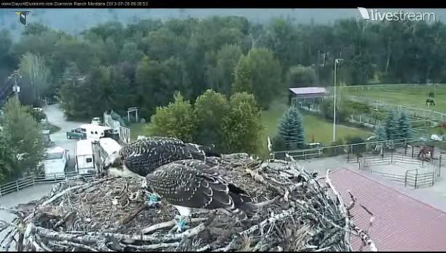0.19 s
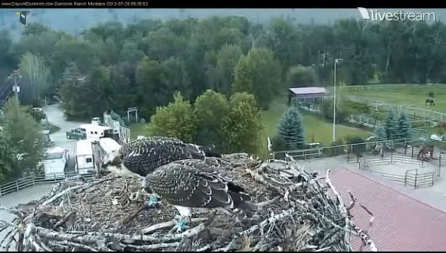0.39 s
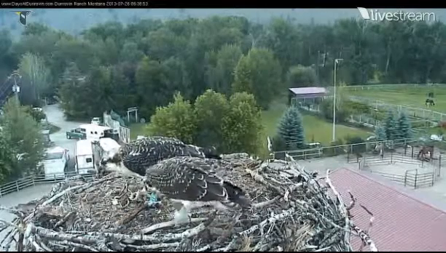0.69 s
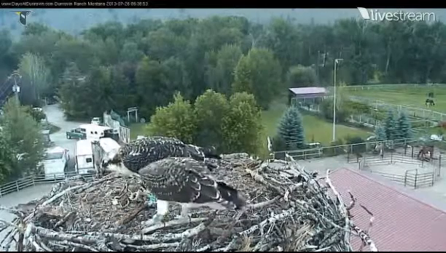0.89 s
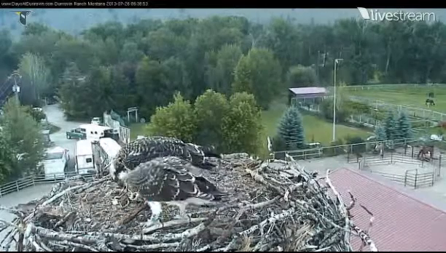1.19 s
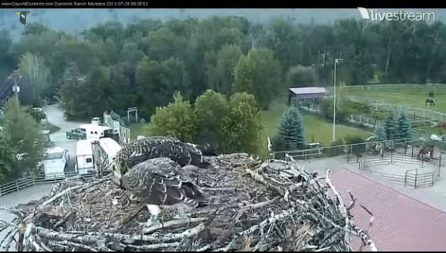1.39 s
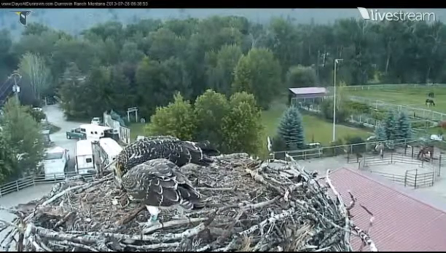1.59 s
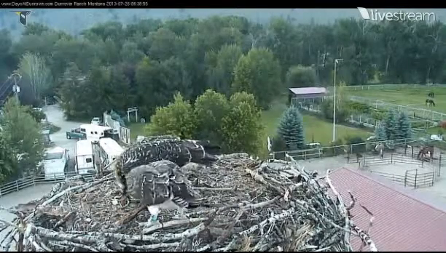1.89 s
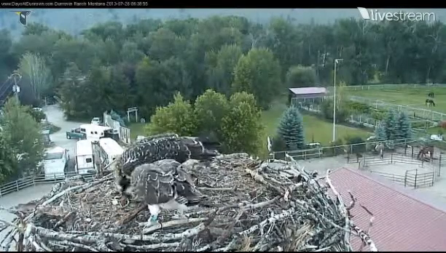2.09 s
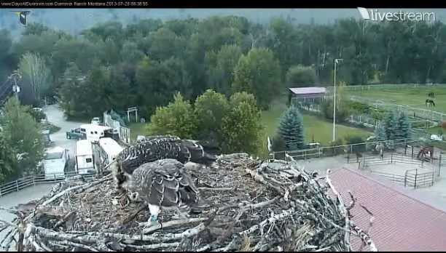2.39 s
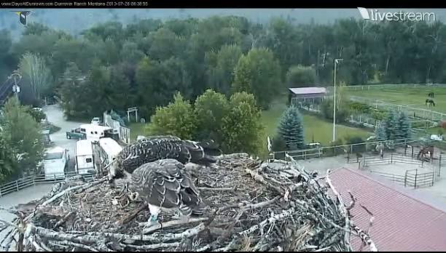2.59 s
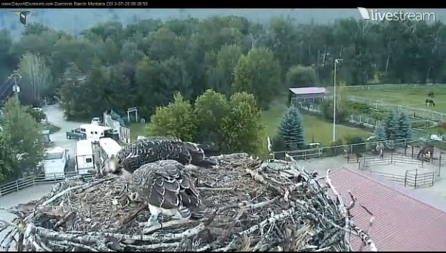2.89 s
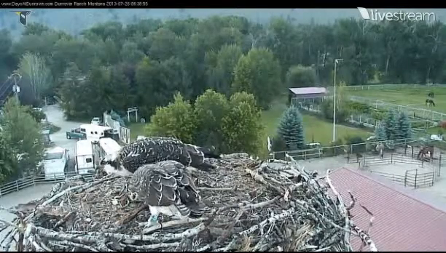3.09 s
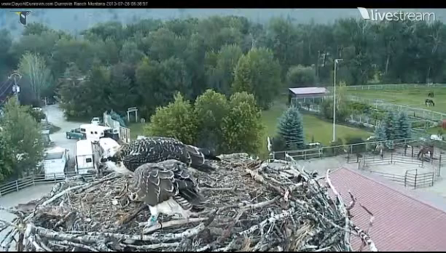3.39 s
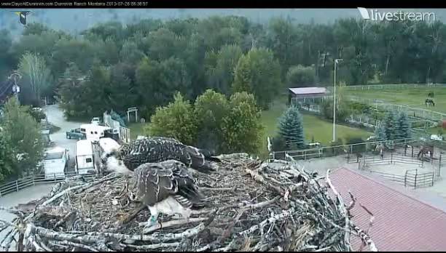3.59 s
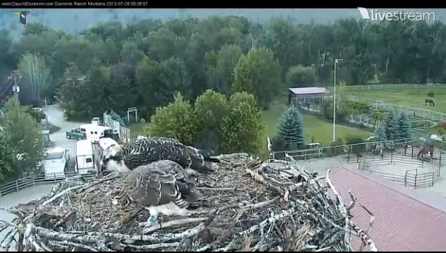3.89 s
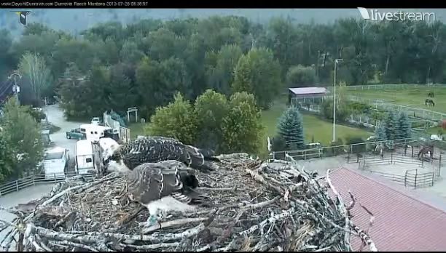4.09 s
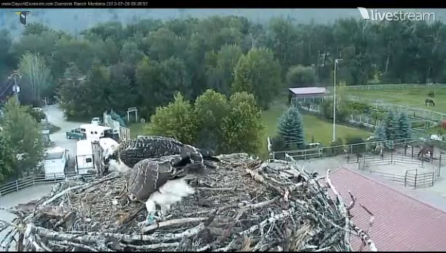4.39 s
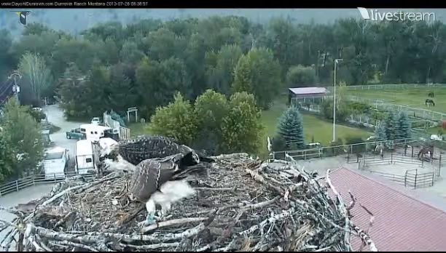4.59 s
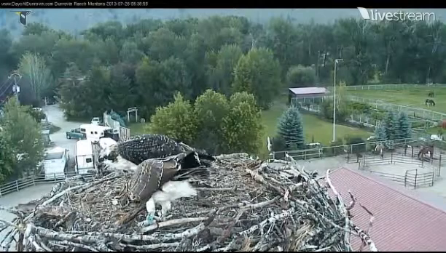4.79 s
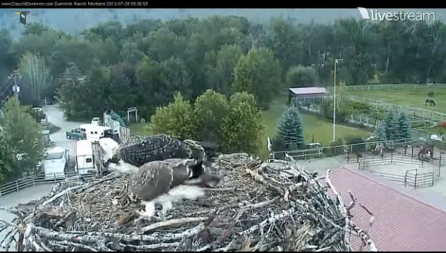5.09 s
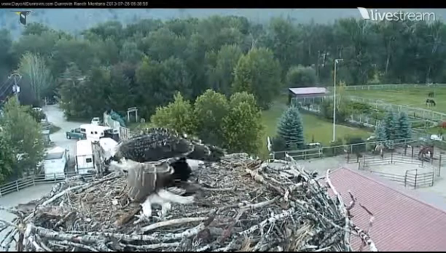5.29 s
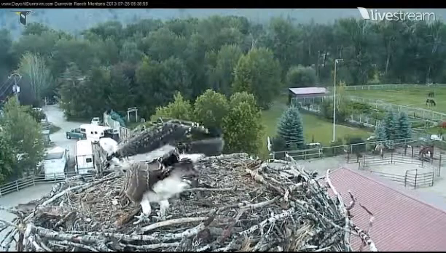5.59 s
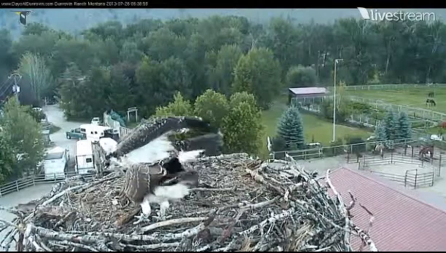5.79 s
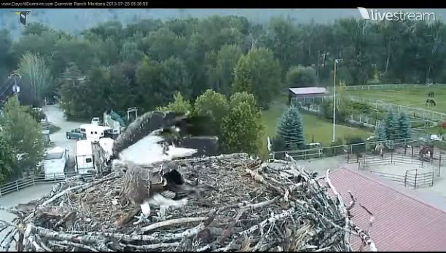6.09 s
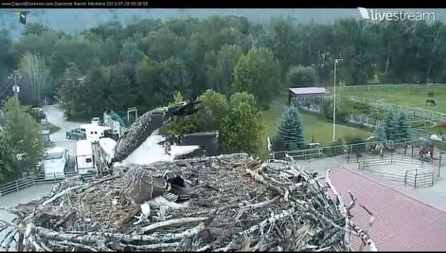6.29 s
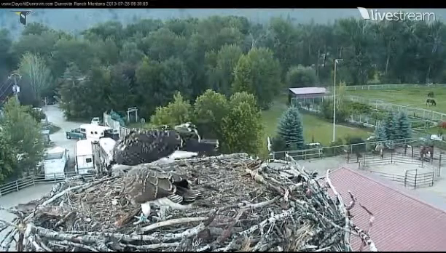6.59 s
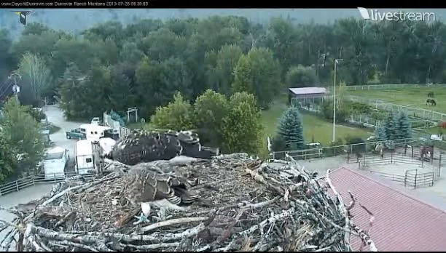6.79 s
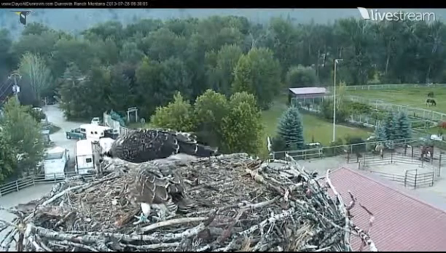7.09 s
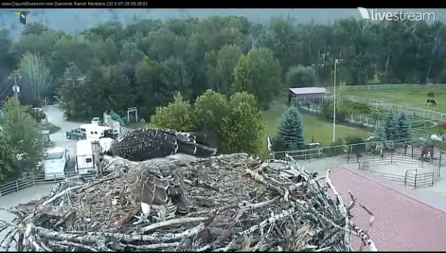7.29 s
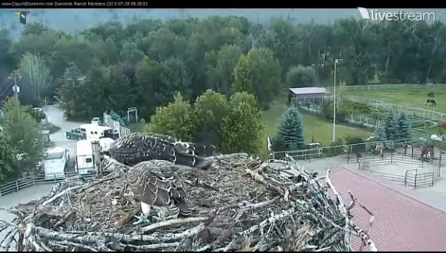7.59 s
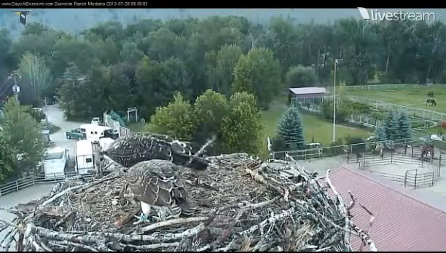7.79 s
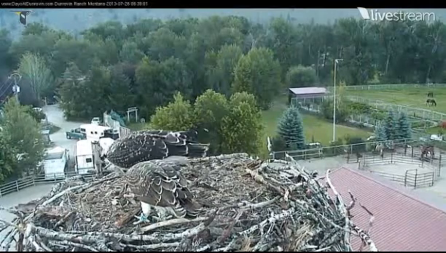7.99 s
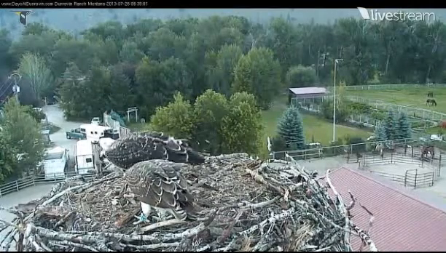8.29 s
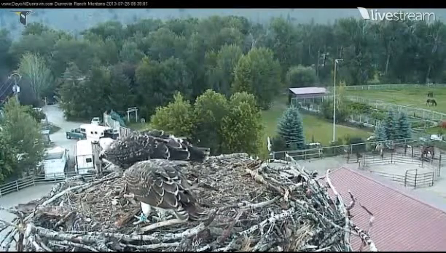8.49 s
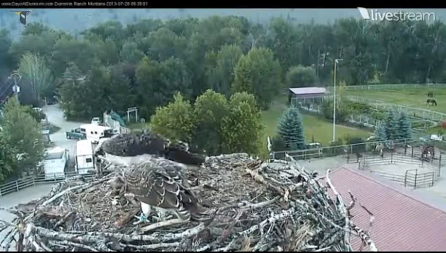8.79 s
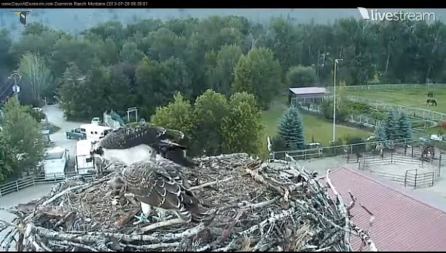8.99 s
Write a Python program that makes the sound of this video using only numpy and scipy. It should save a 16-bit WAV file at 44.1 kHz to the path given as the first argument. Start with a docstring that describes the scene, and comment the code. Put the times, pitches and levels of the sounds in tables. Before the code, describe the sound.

High, loud, slightly overloaded nestling whistles in runs, with chirping small birds, light stick rustles and a low, steady outdoor murmur.

```python
"""Two young birds of prey whistle in their nest by a pole-top microphone: one near-pure, one hoarse with rasp.
Small birds add gliding chirps, shaken burrs and two-voiced falling whistles; short noisy bursts rustle sticks.
Under them lie coloured-noise murmur, random sweeps of far birds, mains tones and a far drone that swells once.
The left channel carries the scene, and the loudest whistles overload it; weak bands drop out, more so near loud
sounds, and the sound steps slightly every 0.1 s. The right has faint idle noise."""
import sys
import numpy as np
from scipy import signal
from scipy.fft import rfft, irfft, next_fast_len
from scipy.io import wavfile
from scipy.ndimage import uniform_filter1d, minimum_filter1d, map_coordinates

SR = 44100
rng = np.random.default_rng(int(sys.argv[2]) if len(sys.argv) > 2 else 0)


def int16_out(signal):
    """Quantize to a 16-bit WAV file."""
    q = np.round(np.clip(np.atleast_2d(signal).T, -1, 1) * 32767)
    wavfile.write(sys.argv[1], SR, q.astype(np.int16))


def gain_from_db(level_db):
    """Convert decibel levels to linear amplitude factors (20 dB per decade)."""
    decades = np.asarray(level_db, float) / 20
    return 10 ** decades


N = 402633
T = np.arange(N) / SR
# Source levels below are at the microphone, ahead of the doubling gain of the left input.


def unit(x):
    """Scaled to rms 1."""
    return x / np.sqrt(np.mean(x ** 2) + 1e-20)


def wobble(rate):
    """A smooth random curve, rate knots a second."""
    return map_coordinates(rng.standard_normal(int(N * rate / SR) + 4), [T * rate])


def filtered(x, response):
    """x times a response of frequency."""
    m = next_fast_len(N + 8192)
    return irfft(rfft(x, m) * response(np.fft.rfftfreq(m, 1 / SR)), m)[..., :N]


def noise(spectrum, patchy_db):
    """Coloured noise of rms 1 whose gain varies in random patches of time and frequency."""
    z = signal.stft(rng.standard_normal(N), nperseg=512)[2]
    field = uniform_filter1d(rng.standard_normal(z.shape), size=4, axis=0)
    field = uniform_filter1d(field, size=6, axis=1)
    patchy = signal.istft(z * gain_from_db(patchy_db * unit(field)), nperseg=512)[1][:N]
    f, db = np.transpose(spectrum)

    def colour(hz):
        return gain_from_db(np.interp(np.log(hz + 1), np.log(f + 1), db, left=-120, right=-120))

    return unit(filtered(patchy, colour))


def voice(notes, jitter_hz, bend_hz=0, size=220):
    """Phase of the syrinx and one gain curve per dB column; silent between notes."""
    s, hz, *dbs = np.vstack(notes).T
    sounding = sum((T >= note[0][0]) & (T < note[-1][0]) for note in notes) > 0
    gate = uniform_filter1d(sounding * 1., size=200)
    pitch = uniform_filter1d(np.interp(T, s, hz), size=size) + bend_hz  # muscles round a glide's corners
    phase = 2 * np.pi * np.cumsum(pitch + jitter_hz * wobble(150)) / SR
    return [phase] + [np.sqrt(2) * gate * gain_from_db(np.interp(T, s, db)) for db in dbs]


def echoes(x, t60):
    """Scattered answer of roofs and trees: a noise tail that falls 60 dB in t60 seconds."""
    tail = rng.standard_normal(SR // 2) * gain_from_db(-60 * T[:SR // 2] / t60)
    return signal.fftconvolve(x, tail / np.linalg.norm(tail))[:N]


# Colour of the valley's murmur: (f/Hz, relative level/dB)
MURMUR_SPECTRUM = [(12, -51.5), (25, -30.5), (59, -21), (85, -8), (110, -6), (150, -12.5), (260, -8),
                   (400, -11.5), (917, -7.5), (1720, -15.5), (3000, -17.5), (4200, -27.5), (5100, -34),
                   (6000, -72)]


def valley_murmur():
    """Traffic and leaves blend into coloured noise whose level drifts slightly."""
    level_db = -36.5 + 0.2 * wobble(3.3) + 0.33 * wobble(6)
    return gain_from_db(level_db) * noise(MURMUR_SPECTRUM, patchy_db=1.5)


def twitter(count):
    """Many far small birds: quick, burry random sweeps that come and go."""
    pitch = [3500 + 450 * wobble(40) for _ in range(count)]  # Hz
    size = [gain_from_db(6 * wobble(30)) * (.5 + wobble(300)) for _ in range(count)]
    sweeps = [a * np.sin(2 * np.pi * np.cumsum(hz) / SR) for a, hz in zip(size, pitch)]
    return unit(sum(sweeps))


# Colour of the noise in the far chorus: (f/Hz, relative level/dB)
CHORUS_SPECTRUM = [(2200, -35.5), (2900, -8.5), (3500, 2), (4100, -13.5), (4800, -11.5)]
# Level of the far chorus, and at 3.85 s of rasping noise from the hoarse nestling:
# (t/s, level/dB ahead of flutter and mixing)
CHORUS_AND_RASP_LEVEL = [(0, -34), (.15, -28.5), (.38, -34.5), (.5, -42), (.7, -40), (1.05, -58.5),
                         (1.6, -34.5), (1.85, -63), (2.3, -33.5), (2.9, -62), (3.23, -34.5), (3.55, -60.5),
                         (3.85, -22), (4.1, -45), (4.4, -44.5), (4.85, -49), (5.05, -38), (5.45, -46.5),
                         (5.75, -52), (5.97, -45.5), (6.35, -69), (6.95, -53), (7.24, -30.5), (7.5, -54),
                         (7.83, -40), (8.05, -68), (8.32, -36.5), (8.7, -70), (9.13, -41.5)]


def distant_chorus():
    """Far birds blur into sweeps, echoes and coloured noise; near 3.85 s it is the hoarse nestling's rasp."""
    birds = twitter(count=4)
    blur = 0.75 * birds + .65 * echoes(birds, t60=0.043) + 0.68 * noise(CHORUS_SPECTRUM, patchy_db=5.5)
    return gain_from_db(np.interp(T, *np.transpose(CHORUS_AND_RASP_LEVEL)) + 4.0 * wobble(10)) * blur


# Mains harmonics: (f/Hz, rms level/dB ahead of wavering)
HUM_LINES = [(119.9, -47), (239.8, -49.5), (359.7, -57.5)]


def mains_hum():
    """Steady-pitched sines whose levels waver."""
    return sum(np.sqrt(2) * gain_from_db(db + 1.2 * wobble(6.2)) * np.sin(2 * np.pi * hz * T)
               for hz, db in HUM_LINES)


def chirp(start, length, first_hz, turn_hz, last_hz, db):
    """Corners (t/s, f/Hz, level/dB) of a chirp: hold, glide to the turn, glide to the end."""
    hold, turn, edge = 0.43, .63, .15  # shares of the length
    share = np.array([0, edge, hold, turn, 1 - edge, 1])
    hz = np.interp(share, [hold, turn, 1], [first_hz, turn_hz, last_hz])
    fade_db = np.array([-7, 0, 0, 0, 0, -7])
    thin_db = -5.5 * np.maximum(hz - 3800, 0) / 1000  # high notes are weaker, per kHz
    return np.transpose([start + length * share, hz, db + fade_db + thin_db])


# Chirps of small birds: (start t/s, length t/s, first f/Hz, turn f/Hz, last f/Hz,
# level/dB ahead of fades and the thinning of high notes)
CHIRPS_OF_BIRDS = [(-.045, .089, 3290, 3950, 2459, -14), (0.183, .05, 3300, 3540, 3124, -23),
                   (0.244, .065, 2171, 3179, 1966, -21), (.97, .055, 3260, 3340, 4390, -45.5),
                   (1.015, .045, 4550, 4900, 4046, -40), (1.945, .055, 3440, 4770, 3580, -40),
                   (2.115, 0.087, 4200, 3950, 3890, -53), (2.197, 0.044, 3150, 4800, 3506, -19),
                   (2.243, .098, 3322, 3880, 2545, -13.5), (2.362, .06, 3516, 3650, 2550, -30),
                   (2.414, .045, 3570, 3500, 2480, -33.5), (2.538, .06, 3750, 4600, 3204, -40),
                   (5.831, .065, 3274, 4694, 3696, -41), (6.378, 0.078, 3550, 3300, 2404, -45.5),
                   (6.459, .06, 3500, 4900, 3745, -39.5), (6.565, 0.051, 3340, 4260, 3890, -44.5),
                   (7.027, 0.065, 3370, 4900, 3512, -23), (7.085, .082, 3313, 3738, 2540, -12),
                   (7.8, 0.053, 3480, 3900, 4050, -41.5), (8.267, 0.057, 3250, 3370, 3270, -38)]
NEAR_DB = -25  # louder chirps come from a bird perched close


def near_chirps():
    """A close bird's gliding whistle throbs about 120 times a second."""
    phase, level = voice([chirp(*row) for row in CHIRPS_OF_BIRDS if row[-1] > NEAR_DB], jitter_hz=39.3)
    throb = np.cos(2 * np.pi * np.cumsum(120 + 35 * wobble(40)) / SR)
    return level * (1.03 + 0.5 * throb) * np.sin(phase)


def clear_call(start, crest, length, hump_hz, sag_hz, crest_hz, sag_db, crest_db):
    """Corners (t/s, f/Hz, level/dB) of one clear call: hump, sag, crest and fall."""
    end = start + length
    start_hz, close_hz, end_hz = 2490, 2480, 2344
    risen_hz = start_hz + .75 * (hump_hz - start_hz)  # most of the climb is done early
    s = [start, start + .008, start + 0.022, start + .042, start + .098,
         crest, end - 0.033, end - 0.01, end]
    hz = [start_hz, start_hz, risen_hz, hump_hz, sag_hz, crest_hz, crest_hz - 111, close_hz, end_hz]
    db = crest_db + np.array([-31, -10.5, -6, -4, sag_db - crest_db, 0, -1, -9, -31])
    return np.transpose([s, hz, db])


# Calls of the clear nestling: (start t/s, crest t/s, length t/s, hump f/Hz, sag f/Hz, crest f/Hz,
# sag level/dB, crest level/dB), ahead of smoothing, flips and wavers
CLEAR_CALLS = [(.05, 0.319, 0.32, 2773, 2510, 2750, -19.5, -9.5),
               (0.587, 0.84, 0.32, 2870, 2685, 2885, -14.5, -6),
               (1.083, 1.305, 0.3, 2925, 2725, 2840, -17, -11),
               (1.553, 1.791, 0.3, 2886, 2725, 2840, -17.5, -8.5),
               (3.046, 3.295, 0.38, 2833, 2595, 2941, -19, -8.5),
               (3.565, 3.849, .38, 2875, 2640, 2875, -19.5, -9.5),
               (4.099, 4.354, 0.31, 2902, 2650, 2966, -18.5, -9),
               (4.811, 5.181, 0.46, 2788, 2600, 2842, -22.5, -8.5)]
# Flips into a higher register: (start t/s, end t/s, jump f/Hz)
REGISTER_FLIPS = [(1.108, 1.142, 370.4), (3.598, 3.623, 322.6), (4.127, 4.16, 424.1), (4.309, 4.374, 419.4)]
# Wavers of the clear voice: (middle t/s, length t/s, offset f/Hz, offset level/dB)
VOICE_WAVERS = [(0.197, 0.0703, 94.5, 1), (3.766, .12, 5.5, 3), (4.138, .03, 6, 2.5), (5.0, .12, -14, -3.5),
                (5.227, 0.047, -71, -1), (3.3, .06, 41, -1.4), (4.352, .05, 94.5, 1.5),
                (0.158, .06, -40, -1.5), (0.614, .05, -5, -1), (0.889, .06, 60.5, 1.5),
                (1.121, .07, 5, 3.5), (1.331, .08, -5, -1)]
# Stretches with uneven cycles: (start t/s, end t/s, peak level/dB ahead of flutter)
UNEVEN_CYCLES = [(1.152, 1.262, -34.5), (1.261, 1.319, -42.5), (1.583, 1.816, -36), (3.113, 3.254, -38)]


def clear_nestling():
    """A nearly pure whistle; uneven cycles add a line at 3/2 of the pitch."""
    flip_hz = 0
    for t0, t1, hz in REGISTER_FLIPS:
        inside = np.clip(np.minimum(T - t0, t1 - T) / .014 + .5, 0, 1)
        flip_hz = flip_hz + hz * np.sin(np.pi / 2 * inside) ** 2
    waver_hz, waver_db = 0, 0
    for middle, length, hz, db in VOICE_WAVERS:
        bump = np.cos(np.pi * np.clip((T - middle) / length, -.5, .5)) ** 2
        waver_hz = waver_hz + hz * bump
        waver_db = waver_db + db * bump
    phase, level = voice([clear_call(*row) for row in CLEAR_CALLS], jitter_hz=8.6,
                         bend_hz=flip_hz + waver_hz, size=600)
    uneven = sum(gain_from_db(db) * np.clip(np.minimum(T - t0, t1 - T) / 0.028, 0, 1)
                 for t0, t1, db in UNEVEN_CYCLES)
    whistle = level * gain_from_db(waver_db + 1.2 * wobble(50) + 0.27 * wobble(200)) * np.sin(phase)
    return whistle + uneven * gain_from_db(1.8 * wobble(50)) * np.sin(3 * phase / 2)


# Short burry notes of small birds: (middle t/s, f/Hz, level/dB ahead of shaking and fades)
BURRY_NOTES = [(.082, 3690, -22), (.13, 3340, -23), (0.291, 2704, -17.5), (0.41, 2700, -25),
               (0.663, 3370, -18.5), (1.159, 3250, -27), (1.611, 3510, -19.5), (1.709, 3320, -30),
               (2.668, 3800, -38), (3.057, 3547, -30), (7.72, 3630, -43), (7.892, 3240, -34.5),
               (8.385, 2940, -31.5), (8.604, 3670, -30), (8.65, 3070, -30), (9.003, 3330, -38),
               (9.05, 3190, -37)]


def burrs():
    """Each note is a tone shaken so fast that it blurs into a band."""
    length_s, spread_hz = 0.05, 300
    out, t = np.zeros(N + SR), T[:round(length_s * SR)]
    for s, hz, db in BURRY_NOTES:
        shake = map_coordinates(rng.standard_normal(400), [2 * spread_hz * t])
        note = gain_from_db(db) * np.hanning(len(t)) * shake * np.sin(2 * np.pi * hz * t)
        out[round((s - length_s / 2) * SR):][:len(t)] += note
    return out[:N]


# Sticks under the feet: (start t/s, level/dB ahead of attack and decay, f/Hz)
STICK_TICKS = [(0.9687, -28, 2886), (3.3448, -14.5, 2940), (5.3694, -30, 2370), (5.443, -28, 2205),
               (5.5233, -28, 2140), (5.9431, -28.5, 3270), (6.0289, -31.5, 2037), (6.0756, -25, 2400),
               (6.1345, -27.5, 2100), (6.671, -34, 2310)]


def sticks():
    """Each rustle is a short scratchy burst around the pitch of its stick."""
    out, t = np.zeros(N + SR), T[:2000]
    for s, db, hz in STICK_TICKS:
        grit = uniform_filter1d(rng.standard_normal(len(t)), size=24)
        ring = (0.63 + unit(grit)) * np.sin(2 * np.pi * hz * t) + .5 * rng.standard_normal(len(t))
        envelope = gain_from_db(db - 60 * t / 0.13) * (1 - np.exp(-t / 0.0045))
        out[round(s * SR):][:len(t)] += envelope * ring
    return out[:N]


def far_chirps():
    """Far gliding whistles, their level broken up by the air."""
    phase, level = voice([chirp(*row) for row in CHIRPS_OF_BIRDS if row[-1] <= NEAR_DB], jitter_hz=59.9)
    return level * gain_from_db(2.5 * wobble(160)) * np.sin(phase)


def falling(start, end, first_hz, last_hz, first_db, db, bend, stops):
    """Points (t/s, f/Hz, level/dB) of one voice of a fall, cut off at the share "stops" of its length."""
    share = np.linspace(0, 1, num=24)
    loudest = .86  # share of the voice's duration
    swell_db = first_db + (db - first_db) * (share / loudest) ** 1.8
    fade_db = db - 20 * (share - loudest) / (1 - loudest)
    level_db = np.where(share < loudest, swell_db, fade_db)
    hz = first_hz + (last_hz - first_hz) * (share * stops) ** bend  # the fall steepens
    return np.transpose([start + (end - start) * share * stops, hz, level_db])


# Two-voiced falling whistles: (start t/s, end t/s, first f/Hz, last f/Hz, first level/dB,
# loudest level/dB, upper voice level/dB against the lower), ahead of flutter
FALLING_WHISTLES = [(2.8, 2.935, 3413, 2780, -43.5, -30, -5.5), (4.51, 4.566, 3325, 2960, -37, -31.5, -5.5),
                    (6.735, 6.877, 3139, 2252, -33, -17, -10), (7.325, 7.469, 3192, 2192, -29, -14.5, -3.5),
                    (8.71, 8.84, 3360, 2930, -49, -42, -0.5)]


def two_voiced_bird():
    """One bird sounds two voices at once; the upper starts higher and stops sooner."""
    low = [falling(*row[:-1], bend=2.1, stops=1) for row in FALLING_WHISTLES]
    high = [falling(t0, t1, hz0 + 760, hz1 + 630, db0 + up_db, db + up_db, bend=1.4, stops=.85)
            for t0, t1, hz0, hz1, db0, db, up_db in FALLING_WHISTLES]
    pair = [voice(notes, jitter_hz=22.96) for notes in (low, high)]
    return sum(level * gain_from_db(3 * wobble(130)) * np.sin(phase) for phase, level in pair)


# Swell of the drone: (t/s, level/dB ahead of its lines' own levels)
DRONE_SWELL = [(4.15, -66), (4.4, -47.5), (4.65, -37.5), (5.0, -38.5), (5.2, -54.5)]
# Lines of the drone: (f/Hz, relative level/dB)
DRONE_TONES = [(265, -1), (352, -2), (515, -4)]


def far_drone():
    """A few low sines, unsteady in level and phase, swell far off."""
    lines = sum(gain_from_db(db + 3.2 * wobble(22)) * np.sin(2 * np.pi * hz * T + .9 * wobble(23))
                for hz, db in DRONE_TONES)
    return gain_from_db(np.interp(T, *np.transpose(DRONE_SWELL), left=-120, right=-120)) * lines


def hoarse_call(start, top, length, hz, db, tired_db, rasp_db, low_rasp_db):
    """Corners (t/s, f/Hz, tone, rasp and low rasp level/dB) of a hoarse call: slide up, hold, slide down."""
    end = start + length
    slide_s, puff_s = .045, 0.01
    slide = end - slide_s
    s = np.array([start, start + puff_s, top, slide, end - slide_s / 2, end - puff_s, end])
    rise_hz = np.interp(s, [start, top], [2200, hz])
    pitch = rise_hz - (hz - 2160) * np.clip(1 - (end - s) / slide_s, 0, 1) ** 2
    effort = np.array([-16, -5, 0, 0, 0, -5, -16])  # dB: hushed edges, weaker feet of the slides
    effort = effort + np.interp(s, [top, slide], [0, tired_db - db])
    air = effort - 6.5 * (s > slide)  # the rasp weakens in the last slide
    return np.transpose([s, pitch, db + effort, rasp_db + air, low_rasp_db + air])


# Calls of the hoarse nestling: (start t/s, top t/s, length t/s, f/Hz, level/dB, level/dB as the hold ends,
# rasp level/dB above the pitch, rasp level/dB below it), ahead of edge fades
HOARSE_CALLS = [(3.576, 3.789, 0.36, 2757, -19, -17.5, -24, -28),
                (4.785, 4.853, 0.34, 2659, -18, -19.5, -26.5, -36),
                (6.955, 7.032, 0.15, 2542, -22.5, -23, -29, -41),
                (7.406, 7.458, .21, 2625, -17.5, -20.5, -29.5, -42.5),
                (7.979, 8.029, 0.28, 2630, -18.5, -23.5, -28.5, -41)]
# Colour of the main rasp: (f/Hz, relative level/dB)
RASP_SPECTRUM = [(1710, -32.5), (2900, -6), (4040, -9.5), (4440, -30), (4510, -42), (4720, -23),
                 (5100, -35), (6630, -60), (11200, -120)]


def hoarse_nestling():
    """A whistle with a blurred octave, and air rasping past the membranes."""
    phase, level, rasp, low_rasp = voice([hoarse_call(*row) for row in HOARSE_CALLS],
                                         jitter_hz=26.17, size=500)
    octave = gain_from_db(-21.0) * (0.88 + wobble(200)) * np.sin(2 * phase)
    tone = gain_from_db(0.6 * wobble(90)) * np.sin(phase) + octave
    under = noise([(1150, -19.0), (1400, -1.5), (2300, 1.0), (2700, -10)], patchy_db=2.5)
    return level * tone + rasp * noise(RASP_SPECTRUM, patchy_db=0.4) + low_rasp * under


def scene():
    """All sources and their echoes at the one microphone, on two equal channels."""
    near = near_chirps()
    others = two_voiced_bird() + burrs() + far_chirps()
    nest = clear_nestling() + hoarse_nestling()
    nest_echo = gain_from_db(-40) * echoes(nest, t60=0.82)
    bird_echo = echoes(gain_from_db(-11.5) * near + gain_from_db(-25) * others, t60=0.26)
    background = valley_murmur() + distant_chorus() + mains_hum() + far_drone()
    return np.tile(nest + near + others + nest_echo + bird_echo + sticks() + background, (2, 1))


# Least level a band keeps before it drops out, raised near loud sounds: (f/Hz, level/dB)
DROPOUT_FLOOR = [(1500, -81), (3000, -73), (4300, -71.5), (4600, -70), (4900, -85.5), (5100, -77.5)]


def dropouts(x, masking_db):
    """Every 0.1 s the sound steps two samples out of step; weak bands drop out, more so near loud sounds."""
    late = np.floor((T - .022) / .1) % 2 == 0  # stretches of 0.1 s
    stepped = np.where(late, np.roll(x, 1), np.roll(x, -1))
    hz, _, z = signal.stft(stepped, SR, nperseg=1024)
    band = uniform_filter1d(np.abs(z) ** 2, size=7, axis=0)
    loud = -minimum_filter1d(-band.max(axis=0), size=7)  # running maximum
    f, db = np.transpose(DROPOUT_FLOOR)
    floor = gain_from_db(np.interp(hz, f, db, left=-140))[:, None] ** 2
    least = floor * (1 + loud * gain_from_db(masking_db) ** 2)
    x = signal.istft(z * (band > least), SR, nperseg=1024)[1][:N]
    return filtered(x, lambda hz: np.clip((5120 - hz) / 120 + .5, 0, 1))  # top edge in Hz, edge width


def high_hiss():
    """A faint narrow band of noise around 6150 Hz flickers."""
    return gain_from_db(-87 + 5 * wobble(25)) * noise([(6000, -6), (6150, 0), (6300, -6)], patchy_db=3)


# Colour of the empty input's noise: (f/Hz, relative level/dB)
IDLE_SPECTRUM = [(20, 0.5), (60, -3), (200, -36), (5000, -36)]


def idle_input():
    """Faint noise of an input with nothing connected, strongest in the bass."""
    return gain_from_db(-91) * noise(IDLE_SPECTRUM, patchy_db=2.0)


def roll_off(x):
    """The treble ends steeply here."""
    return signal.sosfilt(signal.butter(12, 15490, fs=SR, output="sos"), x)


def record(dry):
    """Dropouts, double gain and hard clipping on the left; only idle noise on the right."""
    left = 2 * (dropouts(dry[0], masking_db=21.0) + high_hiss())
    left = left / (1 + np.abs(left) ** 30) ** (1 / 30)  # overload close to a hard clip at 1
    return roll_off(np.array([left, idle_input()]))


dry = scene()
out = record(dry)
int16_out(out)
```